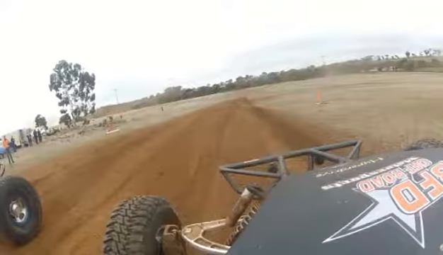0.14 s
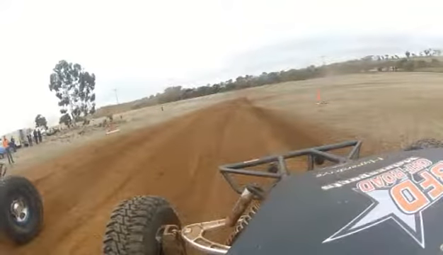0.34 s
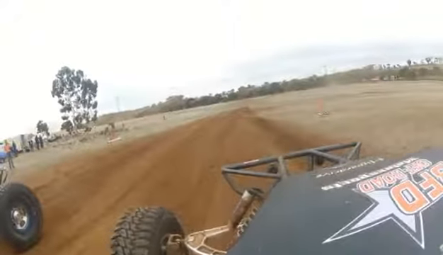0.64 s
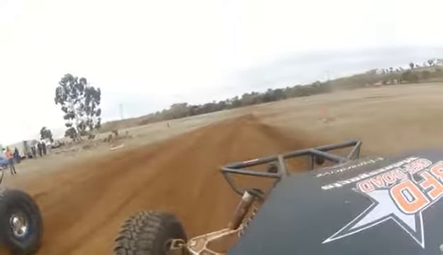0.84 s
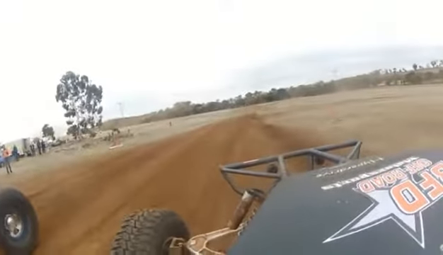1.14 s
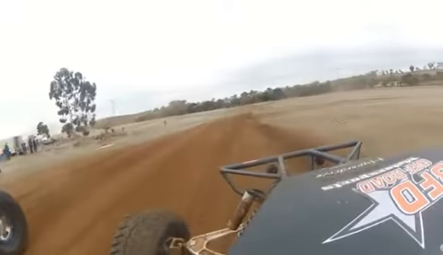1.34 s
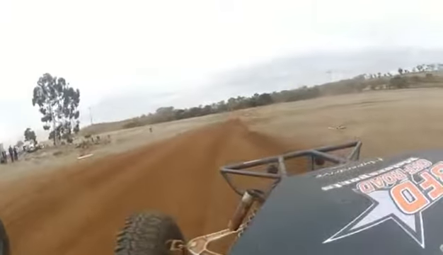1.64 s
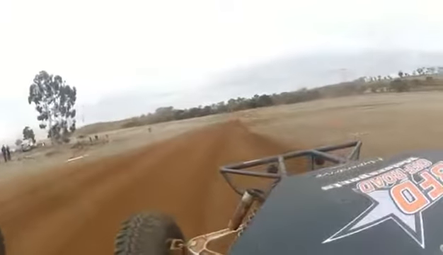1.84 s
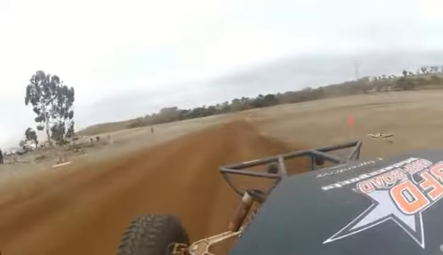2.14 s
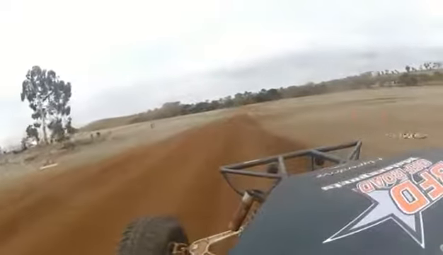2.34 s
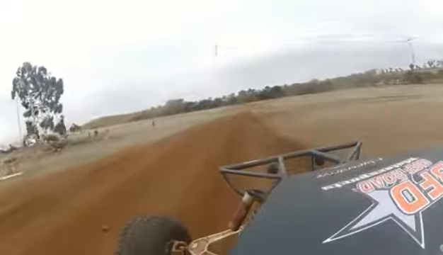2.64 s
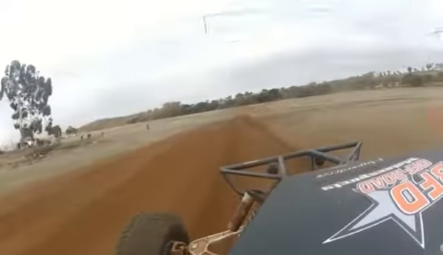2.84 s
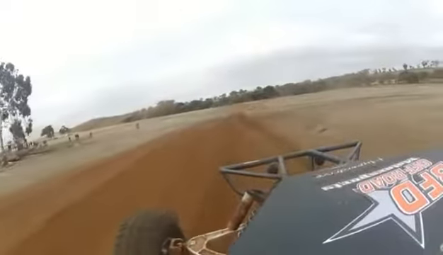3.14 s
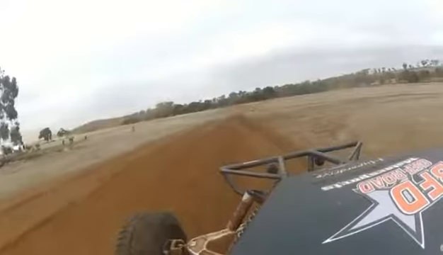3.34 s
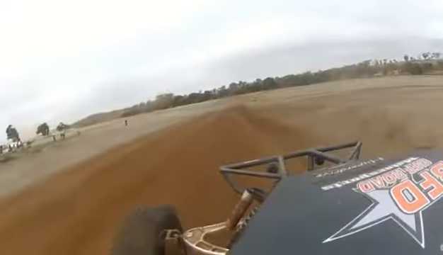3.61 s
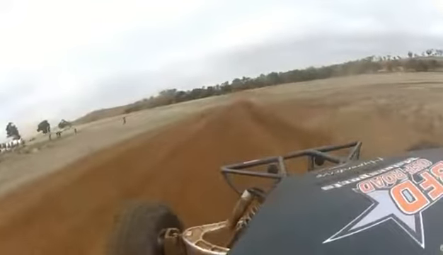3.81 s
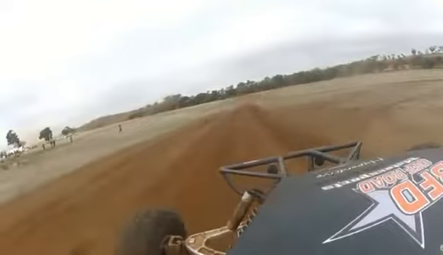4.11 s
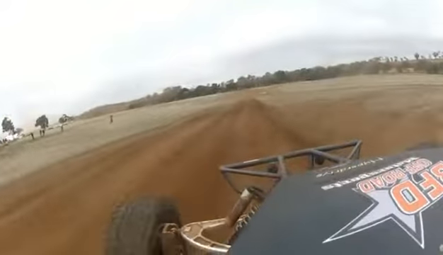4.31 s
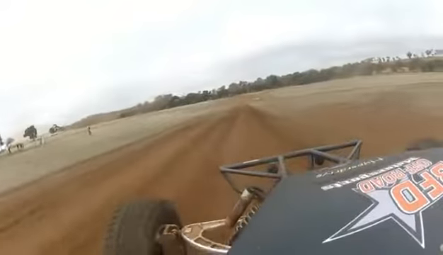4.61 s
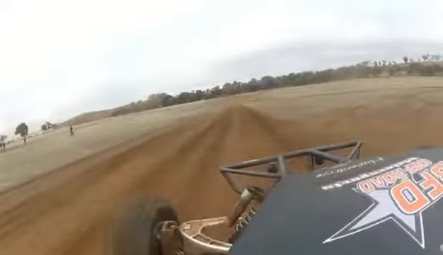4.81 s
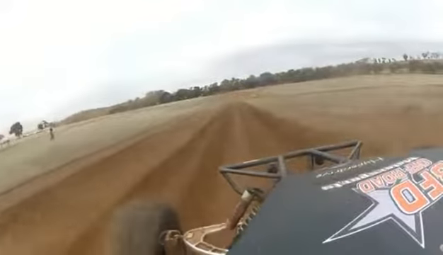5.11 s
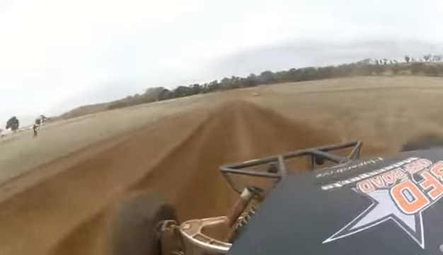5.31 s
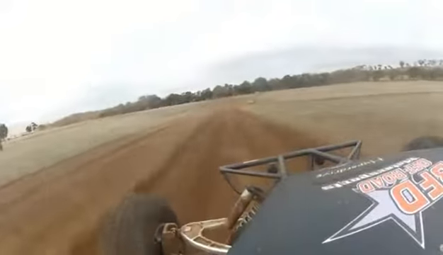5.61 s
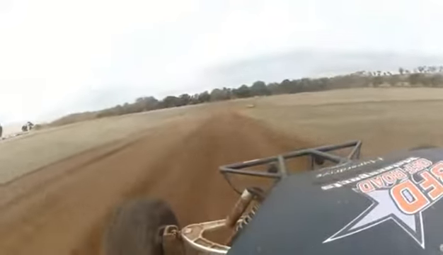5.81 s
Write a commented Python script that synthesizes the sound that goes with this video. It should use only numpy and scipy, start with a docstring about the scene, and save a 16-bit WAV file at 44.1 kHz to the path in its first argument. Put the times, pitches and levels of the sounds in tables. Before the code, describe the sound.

Close onboard sound of an off-road buggy on a dirt track, dense, rough and slightly overloaded, with a glassy digital fizz. From 0 to 0.6 s the engine pulls hard, a raspy mid-low drone with a honking exhaust edge and panels buzzing in step. Around 0.65 s it lifts off with a knock; pitch and level fall, and until about 1.7 s the slack drive line gives paired metallic clacks about every 0.15 s over a faint stumbling engine. Bumps crunch at 1.5-1.9 s as power returns. The pitch climbs, bursting into a loud boom from 2.3 s, pulsing slightly as the wheels hop, dipping briefly, then dropping and cutting near 3.75 s. After a short lull with a knock at 3.9 s, a heavy rumble comes at 4.15 s and the engine lugs low and uneven. Stones crack and skitter underneath, hard knocks strike at 5.25 and 5.5 s, and short wavering brake squeals end it, from 5.5 s.

```python
"""A four-cylinder engine in an off-road buggy pulls, lifts off, revs up to a loud boom, then lugs at low speed:
sums of sinusoids at quarter orders of the firing rate, lifted where an exhaust resonance is crossed.
Filtered noise makes hull drone, roar, panel rattle, dirt and stones; short bursts make bumps, suspension knocks
and the twin clacks of a coasting drive line; unsteady sine notes make the brake squeals at the end.
A slow sample-and-hold converter adds a glassy fizz."""
import sys
import numpy as np
from scipy import signal
from scipy.io import wavfile
from scipy.ndimage import uniform_filter1d

SR = 44100
rng = np.random.default_rng(int(sys.argv[2]) if len(sys.argv) > 2 else 0)


def digitize_waveform(pressure):
    """Quantize a signal to 16-bit integers and store it at the path in sys.argv[1].

    Rows of a 2-D input are taken as channels; values are limited to [-1, 1].
    """
    field = np.atleast_2d(pressure).T
    bounded = np.clip(field, -1, 1)
    quanta = np.round(bounded * 32767).astype(np.int16)
    wavfile.write(sys.argv[1], SR, quanta)


N = 262836
TIME = np.arange(N) / SR


def amp(db):
    """Level law: converts decibels to a linear gain."""
    return 10 ** (np.asarray(db) / 20)


def unit(x):
    """Normalisation: scales a signal to an rms of 1."""
    return x / np.sqrt(np.mean(x ** 2) + 1e-20)


def read(points, hz):
    """Spectral interpolation: dB at any frequency, linear along a logarithmic frequency axis."""
    point_hz, db = np.transpose(points)
    return np.interp(np.log(hz + 1), np.log(point_hz), db)


def add(mix, s, sound):
    """Superposition: adds a sound to the mix from time s in seconds."""
    part = mix[max(round(s * SR), 0):][:len(sound)]
    part += sound[:len(part)]


def colour(x, points, size=8192):
    """Minimum-phase filtering: rings x through a causal body with the given spectrum."""
    log_gain = np.log(amp(read(points, abs(np.fft.fftfreq(size, 1 / SR)))))
    # the Hilbert transform of the log gain supplies the phase of a causal response
    response = np.exp(np.conj(signal.hilbert(log_gain)))
    ring = np.fft.ifft(response).real[:size // 2]
    return signal.oaconvolve(x, ring)[:len(x)]


def wander(hz, count):
    """Band-limited chance: slow random values of about rms 1, varying up to about hz."""
    steps = np.arange(count) * 2 * hz / SR
    # the factor restores the rms lost by linear interpolation
    return np.interp(steps, np.arange(4096), rng.standard_normal(4096)) * np.sqrt(3 / 2)


# At speed the driven wheels hop: the engine races a little and its boom eases on every hop.
HOP_AT_S, HOP_PERIOD_S, HOP_SPEED_SHARE, HOP_DB = 2.888, .157, 0.015, 1.37
# Brief drops of the boom. Each row: centre in seconds, depth in dB, half width in seconds.
BOOM_DIPS = [(1.855, 27, .025), (2.338, 30, 0.017), (2.485, 11, 0.02), (2.94, 4, 0.019), (3.205, 5, .012),
             (3.314, 23, 0.019), (3.428, 9.5, .028), (3.648, 26, 0.017)]


def firings(rows, jitter, hop):
    """Phase accumulation: the integrated firing rate counts firings; returns time, rate, count and tone dB."""
    s, hz, db = np.transpose(rows)
    t = np.arange(s[0], s[-1], 1 / SR)
    lift = hop * np.cos(2 * np.pi * (t - HOP_AT_S) / HOP_PERIOD_S)
    rate = np.interp(t, s, hz) * (1 + HOP_SPEED_SHARE * lift + jitter * wander(34.55, len(t)))
    dip_db = sum(depth * np.exp(-((t - at) / width) ** 2) for at, depth, width in BOOM_DIPS)
    level_db = np.interp(t, s, db) - HOP_DB * lift - dip_db
    return t, rate, np.cumsum(rate) / SR, level_db


# Stretches of the engine's run. Each row: time in seconds, firing rate in Hz before jitter and hop,
# firing tone in dB before the stretch's trim.
FIRST_PULL = [(0, 159.3, -18), (.2, 158.4, -18), (.29, 163.7, -15.5), (.38, 165.3, -14), (.55, 167.9, -16),
              (.625, 164.1, -16.5), (.66, 153.5, -20), (.7, 144, -27)]
COASTING = [(0.699, 136.7, -27), (0.799, 114, -35.5), (1.029, 89, -44.5), (1.15, 99.7, -41),
            (1.301, 96.9, -38), (1.448, 116.7, -37.5), (1.57, 126.5, -28.5), (1.75, 149, -34)]
HIGH_PULL = [(1.75, 162.5, -17), (1.93, 185.8, -15.5), (2.15, 204.1, -16), (2.3, 220.6, -6),
             (2.42, 221.6, -7.5), (2.53, 233.6, -4), (3.1, 234.9, -6.5), (3.4, 239.9, -3.5),
             (3.56, 231.8, -4.5), (3.62, 208.1, -9), (3.735, 202.5, -11.5), (3.795, 201, -50)]
LOW_PULL = [(4.05, 92, -34), (4.4, 95, -26.5), (4.532, 88.85, -29.5), (4.82, 95.2, -26.5),
            (5.032, 95.6, -27), (5.23, 100.1, -23), (5.299, 92.9, -43), (5.47, 94.4, -21),
            (5.6, 113.7, -27.5), (5.95, 121.4, -30.5)]
# Unequal cylinders give quarter orders. Each row: multiple of the firing rate,
# level in dB against the firing tone before the trims.
FIRST_ORDERS = [(0.25, -34), (0.5, -35), (0.75, -13.5), (1, 0), (1.25, -9), (1.5, -8), (1.75, -11),
                (2, -10), (2.25, -43), (2.5, -49), (2.75, -38), (3, -16), (3.25, -26), (3.5, -22),
                (3.75, -19), (4, -9.5), (4.25, -29), (4.5, -35), (4.75, -33), (5, -27), (5.25, -34),
                (5.5, -19.5), (5.75, -28), (6, -13), (6.25, -24), (6.5, -21), (6.75, -33), (7, -13.5),
                (7.25, -22), (7.5, -37), (7.75, -22), (8, -25)]
HIGH_ORDERS = [(.5, -32), (.75, -20), (1.25, -43), (1.75, -34), (2, -18.5), (2.25, -42), (2.5, -48),
               (2.75, -56), (3, -26), (3.75, -30), (4, -29), (5, -27.5)]
LOW_ORDERS = [(.5, -6), (1.5, -5.5), (2, 1), (2.5, -11.5), (3, -8.5), (5, -4), (6, -15)]


def engine(rows, orders, tone_db, overtone_db, jitter, flutter, honk_db=0, bite=0,
           pipe_hz=500, pipe_width_hz=14, follow=1, hop=False):
    """Order synthesis and resonance: the exhaust honks when an order sweeps through the pipe's resonance."""
    t, hz, turns, level_db = firings(rows, jitter, hop)
    count = len(t)
    # overtones ride out short dips, and may swell less than the boom
    load_db = np.minimum(uniform_filter1d(level_db, size=8000), level_db + 12)
    load_db = follow * load_db + (1 - follow) * np.median(load_db)
    # below its usual speed the engine stumbles
    flutter = flutter * np.clip((np.median(hz) / hz) ** 7, 1, 3)
    firing_tone = np.cos(2 * np.pi * turns) * (1 + flutter * wander(40, count))
    out = amp(level_db + tone_db) * firing_tone
    for order, db in orders:
        if order == 1:  # the firing tone itself is already there
            continue
        honk = honk_db / (1 + ((order * hz - pipe_hz) / pipe_width_hz) ** 2)
        # under load the exhaust pulses sharpen, which lifts the whole harmonics
        whole_harmonic = order > 2 and order % 1 == 0
        sharpness = bite * (load_db - np.median(load_db)) * whole_harmonic
        # no two firings are alike in strength and timing
        uneven = 1 + flutter * order * (wander(30, count) + 1j * wander(30, count))
        wave = (uneven * np.exp(2j * np.pi * (order * turns + rng.random()))).real
        out += amp(load_db + db + overtone_db + honk + sharpness) * unit(wave) / np.sqrt(2)
    return t[0], np.sqrt(2) * out * signal.windows.tukey(count, .02)


# Shaking of the car. Each row: time in seconds, then hull drone, roar and rattle in dB before trims and swells.
SHAKING = [(0, -18, -17, -17), (.4, -20, -17.5, -19), (.66, -20.5, -20.5, -21), (.77, -32, -29.5, -26),
           (1.1, -33, -32, -28.5), (1.45, -29, -31, -26), (1.779, -20, -21.5, -23.5), (1.87, -34, -24, -25),
           (1.97, -19, -20.5, -18.5), (2.35, -18, -20.5, -17), (2.65, -29.5, -25, -22),
           (3.2, -25.5, -24.5, -21), (3.42, -25, -21, -19), (3.6, -22, -27, -25.5),
           (3.721, -23, -25, -17.5), (3.89, -32, -29, -27), (4.02, -25.5, -27.5, -25),
           (4.15, -20, -21, -20), (4.6, -23, -22, -18.5), (5.23, -24.5, -22.5, -17.5),
           (5.29, -25, -27, -29), (5.6, -25.5, -23, -19), (5.96, -22, -26, -20.5)]
# Knocks of the track through the chassis. Each row: time in seconds, rumble in dB.
TRACK_RUMBLE = [(0, -44), (1, -37.5), (2.15, -35), (2.35, -28.5), (2.55, -44), (3.92, -33), (4.17, -17.5),
                (4.45, -32), (4.8, -25), (4.92, -26.5), (5.2, -25.5), (5.38, -34), (5.52, -28), (5.96, -39)]
# Share of the rattle that repeats with the engine cycle. Each row: time in seconds, share from 0 to 1.
BUZZ_SHARE = [(0, .88), (.25, .8), (.58, .75), (.7, .05), (1.6, .05), (1.95, .5), (2.4, .45), (3.55, .35),
              (3.7, .05), (4.1, .2), (5.96, .25)]
# Spectra of chassis rumble, hull, roar, loose panels and engine-driven buzz.
# Each row: frequency in Hz, relative level in dB per Hz.
RUMBLE_SPECTRUM = [(15, -30), (30, -29), (45, 3), (65, -3), (100, -3.5), (140, -3.5), (200, -16),
                   (400, -86)]
HULL_SPECTRUM = [(70, -34.5), (145, -14.5), (190, -3.5), (245, 5), (290, -5.5), (340, -14.5), (400, -31.5),
                 (700, -48)]
ROAR_SPECTRUM = [(300, -23.5), (400, -15), (480, 3), (590, 0.5), (700, -7.5), (790, -18), (880, -6),
                 (1000, -4), (1250, -7.5), (1500, -4), (2000, -21), (4000, -35.5)]
PANEL_SPECTRUM = [(700, -24), (1200, -36), (1600, -3.5), (2050, 2.5), (2300, -2), (2530, 2), (2720, -12),
                  (3100, -12), (3600, -7), (4000, -26), (4800, -30), (5200, -21), (5900, -41.5)]
BUZZ_SPECTRUM = [(700, -29.5), (1200, -14), (1580, -3.5), (2050, -2), (2400, 1), (2600, -10), (2750, -14.5),
                 (3150, -7), (3600, -17.5), (4000, -28), (5200, -30), (5900, -27.5)]


def ride(drone_db=3, shake_db=1.81, grit_db=-5, grit_per_s=400, chuff=0.033,
         surge_db=1, sway_db=3, sway_hz=8, size=512):
    """Forced vibration: the track shakes chassis and hull; panels buzz with the engine, and dirt peppers them."""
    s, *columns = np.transpose(SHAKING)
    drone, roar, rattle = (amp(np.interp(TIME, s, c)) for c in columns)
    drone = drone * amp(sway_db * wander(sway_hz, N))  # uneven swells
    rumble = amp(np.interp(TIME, *np.transpose(TRACK_RUMBLE)))
    low, hull, gas, rush = rng.standard_normal((4, N))

    s, hz, _ = np.vstack([FIRST_PULL, COASTING, HIGH_PULL, LOW_PULL]).T
    turns = np.cumsum(np.interp(TIME, s, hz)) / SR
    firing = 1 + chuff * np.cos(2 * np.pi * turns)
    # the same pattern of knocks comes round every four firings
    pattern = rng.standard_normal(size)
    buzz = unit(np.interp(turns / 4, np.arange(size) / size, pattern, period=1))
    locked = np.clip(np.interp(TIME, *np.transpose(BUZZ_SHARE)), 0, 1)
    loose = np.sqrt(1 - locked) * amp(shake_db * wander(35, N) + surge_db * wander(7, N))

    grit = unit(rng.standard_normal(N) * (rng.random(N) < grit_per_s / SR))
    peppering = (rush * firing + amp(grit_db) * grit) * loose
    dirt = unit(colour(peppering, PANEL_SPECTRUM)) * np.sqrt(1 - locked.mean())
    panels = dirt + np.sqrt(locked) * unit(colour(buzz * firing, BUZZ_SPECTRUM))
    return (rumble * unit(colour(low, RUMBLE_SPECTRUM))
            + amp(drone_db) * drone * unit(colour(hull * (1 - locked), HULL_SPECTRUM))
            + roar * unit(colour(gas * firing * loose, ROAR_SPECTRUM))
            + rattle * panels)


# Spectrum of the underside under stones. Each row: frequency in Hz, relative level in dB per Hz.
STONE_SPECTRUM = [(400, -5), (1200, -1), (2200, 9), (2800, -23), (3650, 6), (4100, -25.5), (5300, -6),
                  (5900, -25.5)]


def stones(db=-13, per_s=90, spread_db=3, rough_ground=0.13):
    """Random impacts: tyres fling small stones at the underside, louder where the ground is rough."""
    s, _, _, rattle_db = np.transpose(SHAKING)
    road_db = np.interp(TIME, *np.transpose(TRACK_RUMBLE))
    struck = rng.exponential(1, N)
    size = amp(spread_db * np.minimum(struck, 2)) * (rng.random(N) < per_s / SR)
    # each hit scrapes on with a 3.2 ms decay
    scrape = signal.lfilter([1], [1, -np.exp(-1 / (0.0032 * SR))], size) * rng.standard_normal(N)
    level_db = db + np.interp(TIME, s, rattle_db) + rough_ground * (road_db - road_db.max())
    return amp(level_db) * unit(colour(scrape, STONE_SPECTRUM))


# Bumps that shake the whole body. Each row: start in seconds, level in dB before scaling by length,
# length in seconds, panel rattle in dB against the roar.
BUMPS = [(0.64, -17.5, 0.037, 0), (1.245, -22.5, .045, 8), (1.555, -18.5, 0.023, 11),
         (1.63, -20.5, 0.042, 4), (1.68, -18, 0.051, 10), (1.774, -18, 0.044, -1),
         (1.804, -15.5, 0.038, 6.5), (1.912, -17.5, .04, -2), (3.409, -20, 0.053, 10),
         (3.651, -12.5, 0.039, -0.5), (3.718, -19, .03, -2), (4.037, -15, 0.02, 6),
         (4.134, -19.5, 0.042, -19), (4.298, -15, 0.035, 6), (5.236, -23, 0.029, -5),
         (5.453, -17, .019, -11), (5.617, -17, 0.02, 3)]


def bump(s, db, length, panel_db=0, hull_db=-2, rise_s=0.0013):
    """Broadband shock excitation: a jolt sets roar, panels and hull crunching at once."""
    t = np.arange(SR // 6) / SR
    jolt = rng.standard_normal(len(t)) * np.minimum(t / rise_s, 1) * np.exp(-(t / length) ** 4)
    crunch = unit(colour(jolt, ROAR_SPECTRUM))
    crunch += amp(panel_db) * unit(colour(jolt, PANEL_SPECTRUM))
    crunch += amp(hull_db) * unit(colour(jolt, HULL_SPECTRUM))
    return s, amp(db) * unit(crunch) * np.sqrt(length / t[-1])


# Spectrum of metal striking metal. Each row: frequency in Hz, relative level in dB per Hz.
CLACK_SPECTRUM = [(400, -28.5), (1000, -5.5), (1750, 0.5), (2060, 13), (2500, 4), (2750, -0.5), (3450, 1),
                  (4100, -14), (5000, -21.5), (5900, -18)]
# Single knocks from the suspension. Each row: start in seconds, strike peak in dB, main ring in Hz,
# hull thump in dB against the strike.
KNOCKS = [(0.6715, -5.5, 2000, -20), (1.543, -5, 2423, -24), (3.934, -5.5, 1940, -12.5),
          (4.038, -15, 2196, -10), (5.232, -4, 1865, -3), (5.255, -3.5, 1950, -9), (5.517, -3, 2307, -6),
          (5.659, -9, 2045, -13)]


def clack(s, db, ring_hz, thump_db, length, ring_db=-4, ring_s=0.0043, tail_db=-19, tail_s=0.011):
    """Impact and modal decay: metal parts chatter for milliseconds and ring; the hull answers with a thump."""
    t = np.arange(SR // 8) / SR
    burst = np.exp(-(t / length - .8) ** 2 * 2)
    chatter = burst + amp(tail_db) * np.exp(-t / tail_s)
    strike = colour(rng.standard_normal(len(t)) * chatter, CLACK_SPECTRUM)
    ring = np.sin(2 * np.pi * ring_hz * t) * t / ring_s * np.exp(1 - t / ring_s)
    metal = strike / abs(strike).max() + amp(ring_db) * ring / 2
    thump = colour(rng.standard_normal(len(t)) * burst, HULL_SPECTRUM)
    return s, amp(db) * (metal + amp(thump_db) * thump / abs(thump).max())


CLACK_HZ, REBOUND_HZ = 2480, 2040
SCRAPE_AFTER_S, SCRAPE_LENGTH_S, SCRAPE_DB = 0.093, 0.028, -29  # dB before scaling by length
# While coasting, slack in the drive line clacks twice on every wheel turn. Each row: start in seconds,
# clack strike peak in dB, rebound delay in seconds, rebound strike peak in dB.
WHEEL_TURNS = [(.728, 0, 0.062, -4.5), (.879, -2, 0.051, -5), (1.024, -5.5, 0.049, -4.5),
               (1.172, -3.5, 0.051, -4.5), (1.321, -2, .047, -3), (1.471, -8.5, .038, -8.5),
               (1.616, -11, 0.044, -6.5)]


def drive_line():
    """Backlash impact: each wheel turn brings a clack with a thump, a rebound and a scrape."""
    out = np.zeros(N)
    for s, db, gap_s, rebound_db in WHEEL_TURNS:
        add(out, *clack(s, db, ring_hz=CLACK_HZ, thump_db=-10.5, length=0.0051))
        add(out, *clack(s + gap_s, rebound_db, ring_hz=REBOUND_HZ, thump_db=-15, length=0.0043))
        scrape_s = s + SCRAPE_AFTER_S
        add(out, *bump(scrape_s, SCRAPE_DB, SCRAPE_LENGTH_S, panel_db=15, hull_db=-6, rise_s=0.013))
    return out


# Larger stones that strike the underside. Each row: start in seconds, peak in dB.
BIG_STONES = [(4.178, -8.5), (4.326, -15), (4.425, -12), (4.573, -12), (4.657, -4), (4.729, -8),
              (4.851, -11.5), (4.925, -13), (5.455, -10.5), (5.62, -16)]


def big_stone(s, db, decay_s=0.013):
    """Impulsive excitation with exponential decay: a larger stone cracks on the underside and skitters off."""
    t = np.arange(SR // 16) / SR
    crack = colour(rng.standard_normal(len(t)) * np.exp(-t / decay_s), STONE_SPECTRUM)
    return s, amp(db) * crack / abs(crack).max()


# Brake squeals. Each row: start in seconds, length in seconds, start and end pitch in Hz before the waver,
# rms level in dB before the fades.
SQUEALS = [(5.533, 0.11, 2118, 2032, -22), (5.654, 0.057, 2008, 1915, -18.5),
           (5.722, 0.086, 2056, 2006, -25), (5.777, 0.056, 1967, 1947, -19),
           (5.871, 0.12, 1990, 2009, -17.5)]


def squeal(s, length, start_hz, end_hz, db, waver=0.0082):
    """Friction-driven vibration: a brake pad sings in short, unsteady, frequency-modulated notes."""
    count = round(length * SR)
    hz = np.linspace(start_hz, end_hz, count) * (1 + waver * wander(147, count))
    note = np.sqrt(2) * np.sin(2 * np.pi * np.cumsum(hz) / SR)
    return s, amp(db) * note * signal.windows.tukey(count, .5)


def scene():
    """Superposition: engine, ride noise and knocks add up as heard from the car."""
    mix = ride() + stones() + drive_line()
    add(mix, *engine(FIRST_PULL, FIRST_ORDERS, tone_db=1.0, overtone_db=-1.5, jitter=0.001, flutter=0.021,
                     honk_db=16.0, bite=0.92))
    add(mix, *engine(COASTING, LOW_ORDERS, tone_db=-0.5, overtone_db=-2.5, jitter=0.03, flutter=0.48))
    add(mix, *engine(HIGH_PULL, HIGH_ORDERS, tone_db=-0.5, overtone_db=1.0, jitter=0.0091, flutter=0.14,
                     honk_db=10, pipe_hz=593, pipe_width_hz=31, follow=0.87, hop=True))
    add(mix, *engine(LOW_PULL, LOW_ORDERS, tone_db=2.5, overtone_db=-0.5, jitter=0.017, flutter=0.26))
    for row in BUMPS:
        add(mix, *bump(*row))
    for row in KNOCKS:
        add(mix, *clack(*row, length=0.0052))
    for row in BIG_STONES:
        add(mix, *big_stone(*row))
    for row in SQUEALS:
        add(mix, *squeal(*row))
    return mix[None]


HOLD_HZ, EDGE_HZ = 12000, 15500  # converter's sample rate and final low-pass edge


def record(dry):
    """Saturation and imaging: peaks are rounded off; held samples mirror the sound around the converter's rate."""
    rounded = dry / (1 + dry ** 8) ** (1 / 8)
    slow = signal.resample_poly(rounded, HOLD_HZ, SR, axis=1)
    held = np.repeat(slow, 4, axis=1)
    out = signal.resample_poly(held, SR, 4 * HOLD_HZ, axis=1)[:, :N]
    low_pass = signal.firwin(255, EDGE_HZ, window=("kaiser", 9), fs=SR)
    return signal.oaconvolve(out, low_pass[None], "same")


dry = scene()
out = record(dry)
digitize_waveform(out)
```